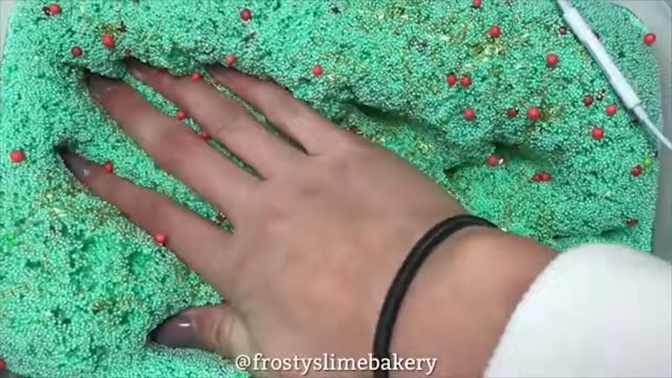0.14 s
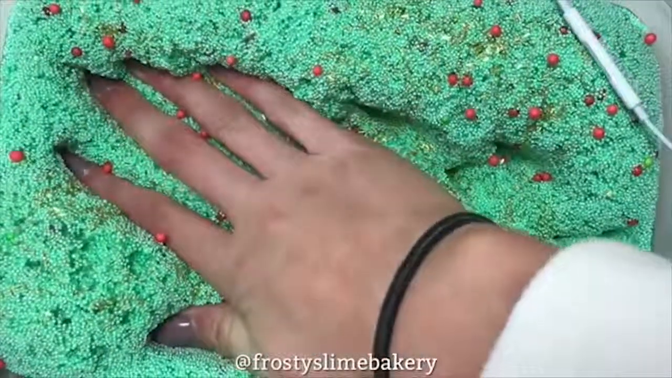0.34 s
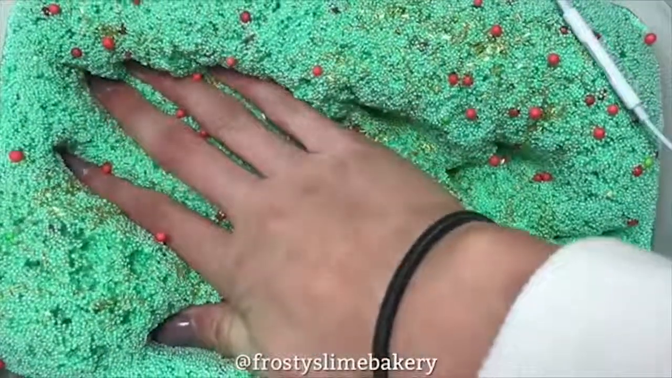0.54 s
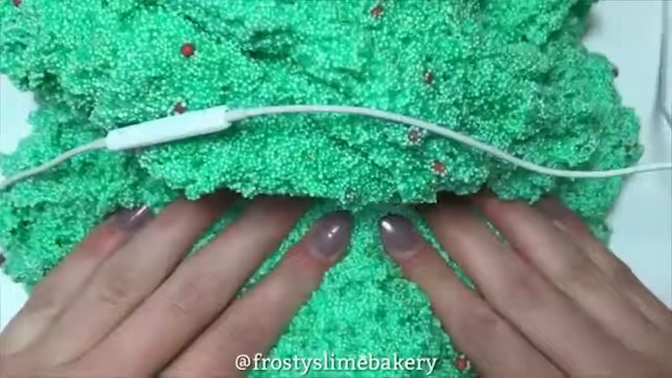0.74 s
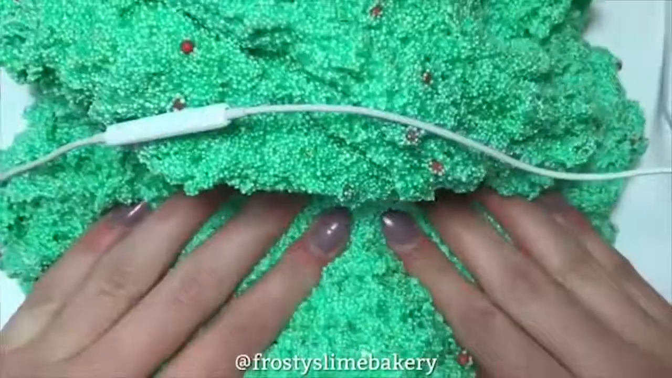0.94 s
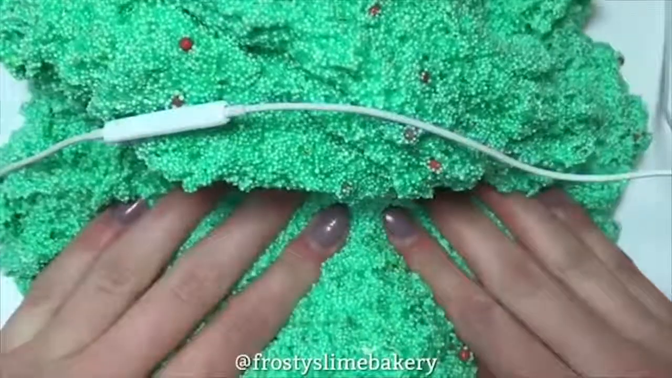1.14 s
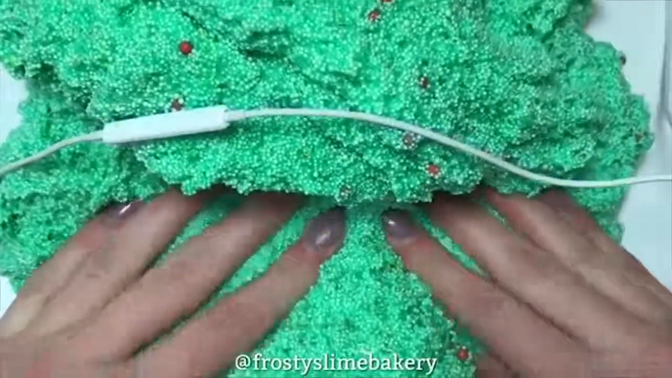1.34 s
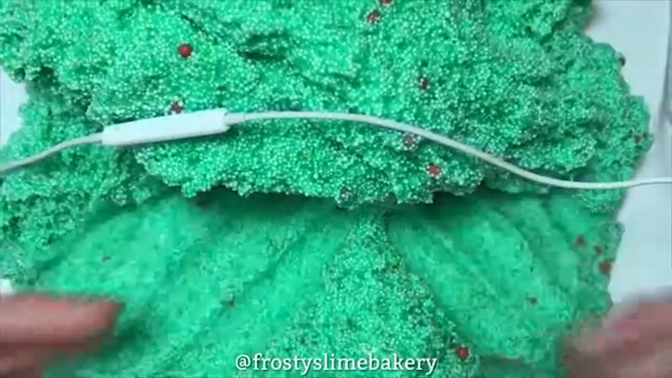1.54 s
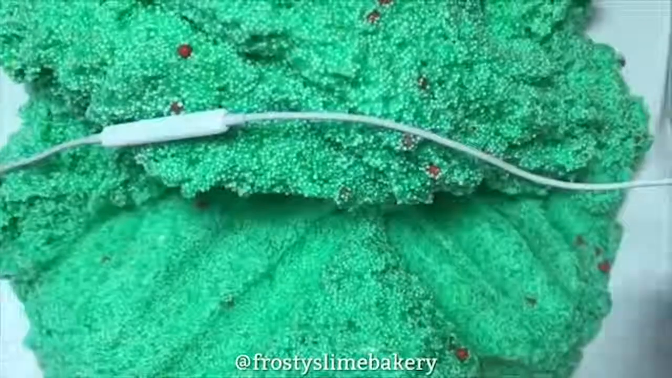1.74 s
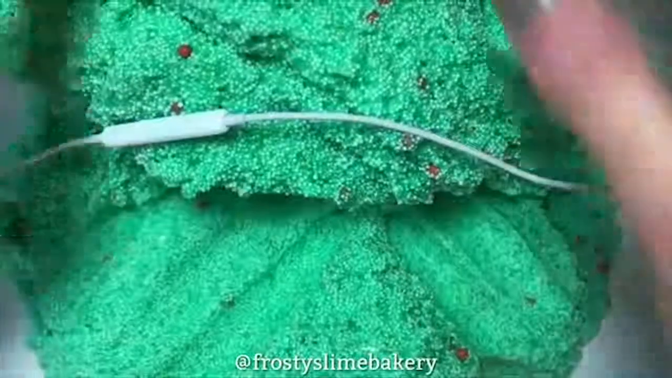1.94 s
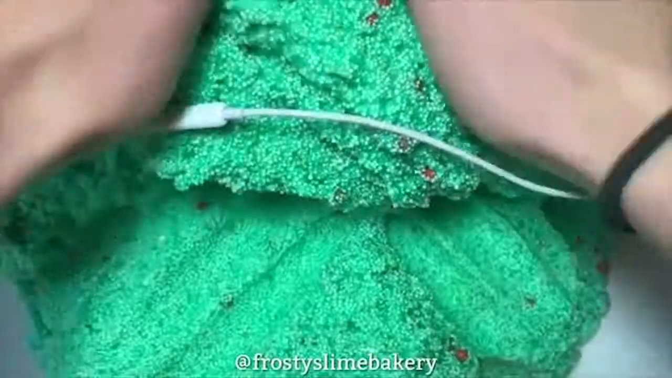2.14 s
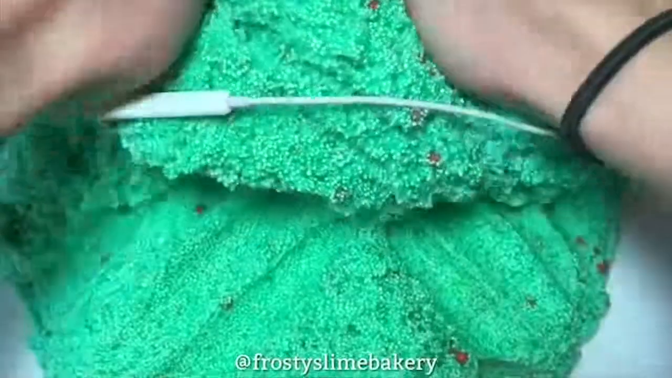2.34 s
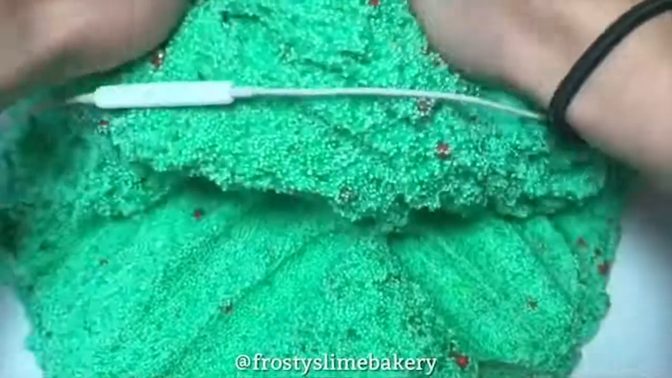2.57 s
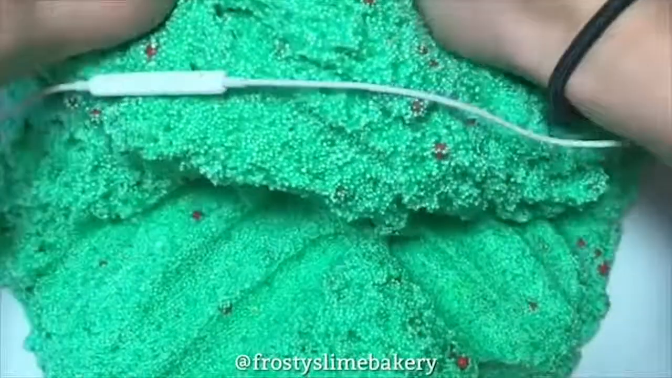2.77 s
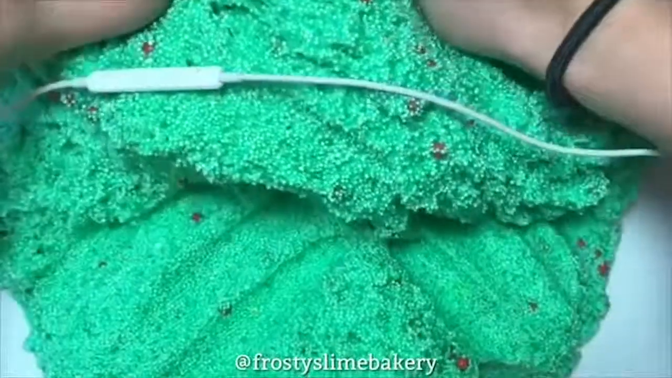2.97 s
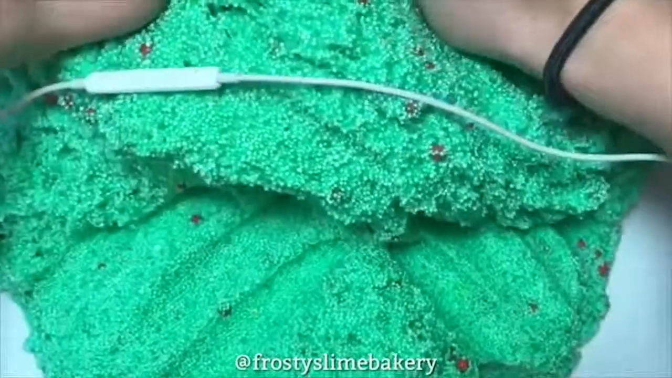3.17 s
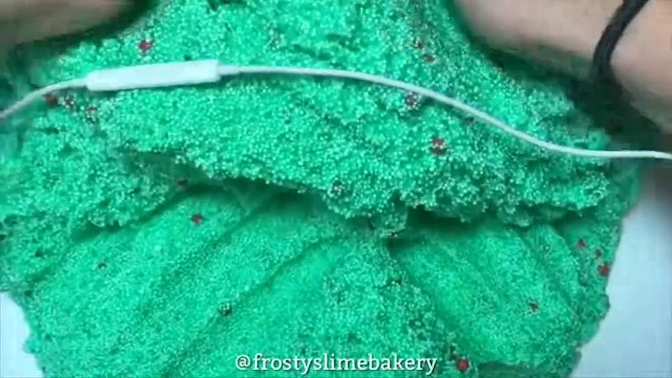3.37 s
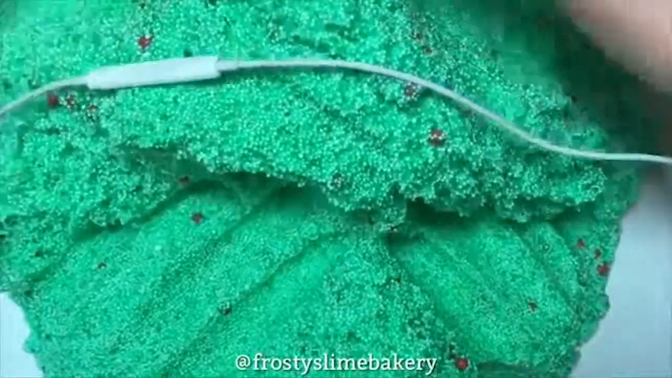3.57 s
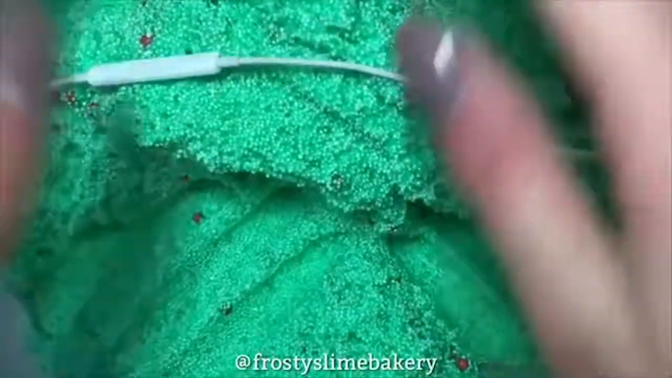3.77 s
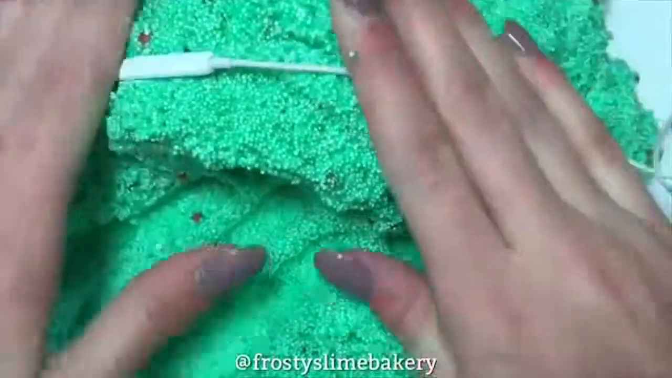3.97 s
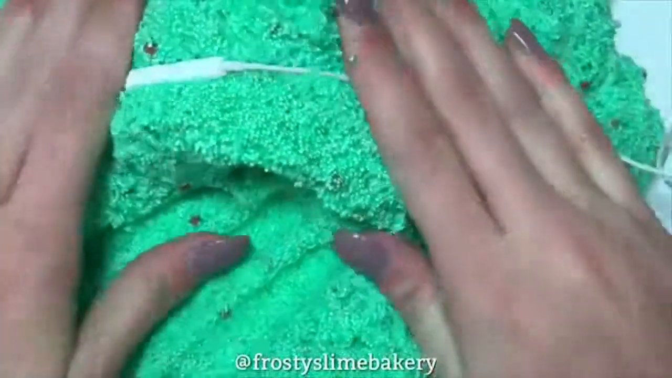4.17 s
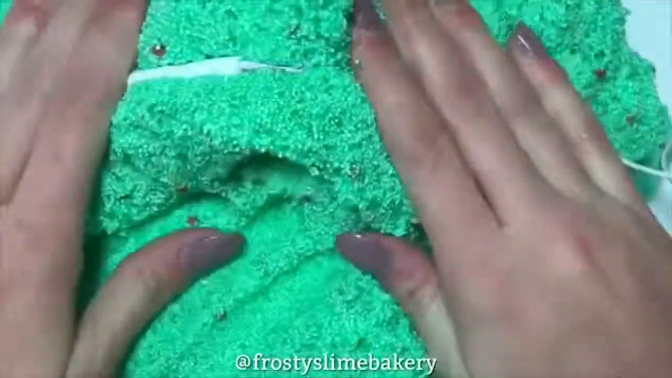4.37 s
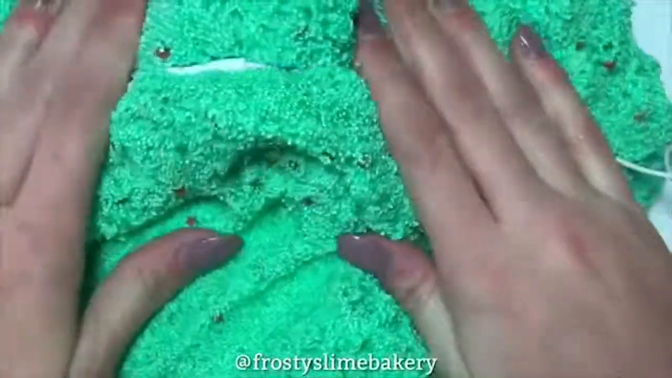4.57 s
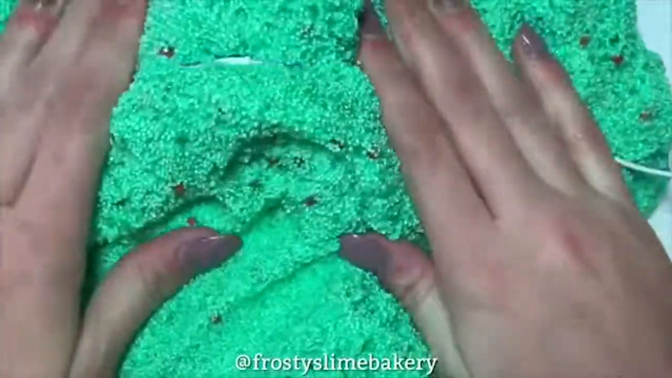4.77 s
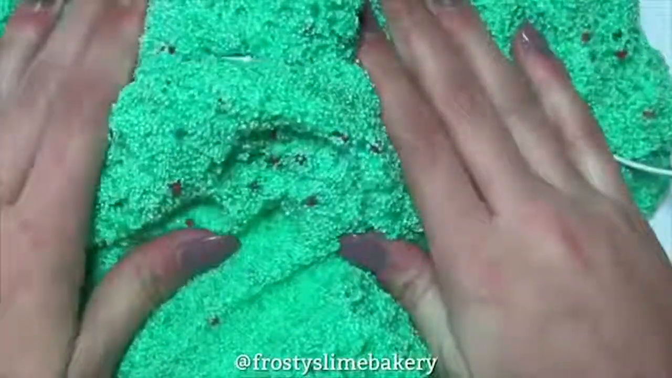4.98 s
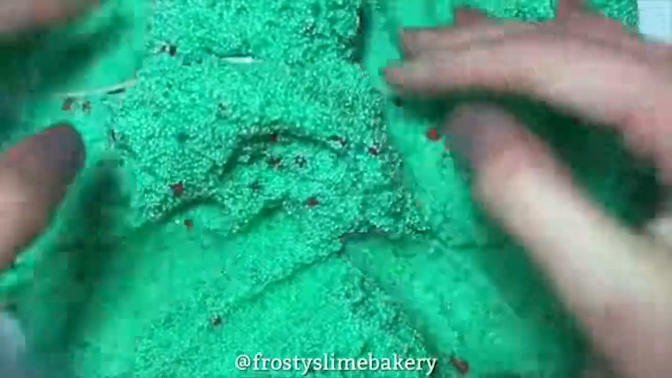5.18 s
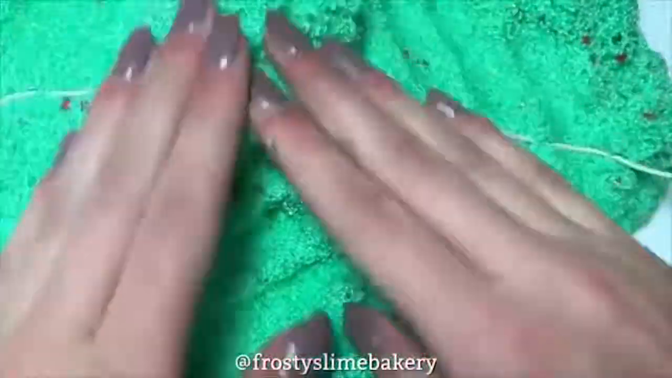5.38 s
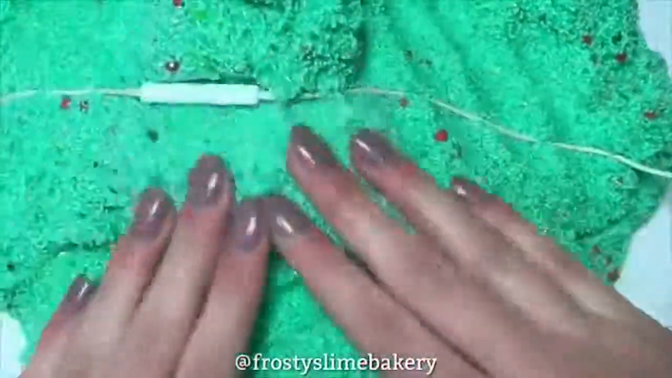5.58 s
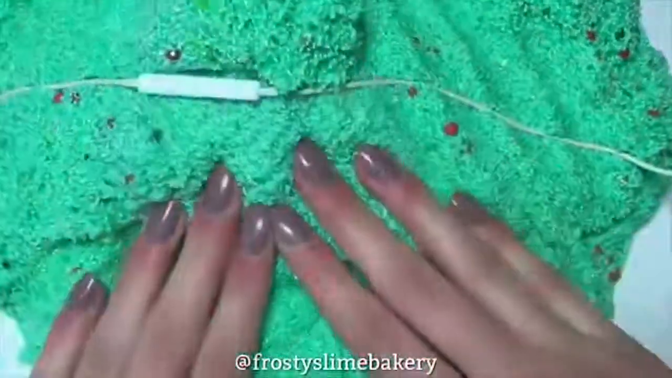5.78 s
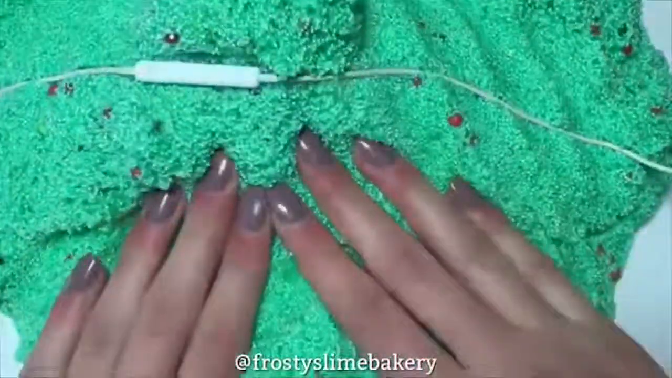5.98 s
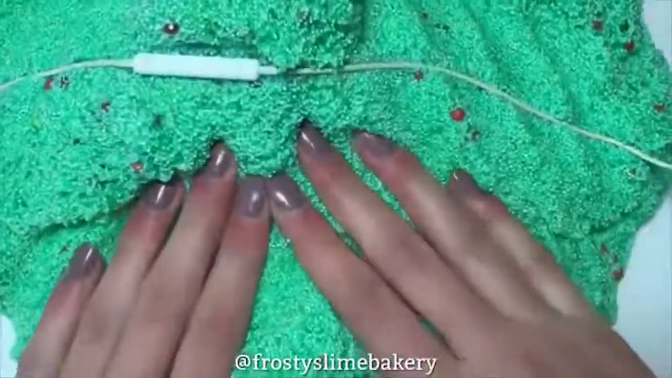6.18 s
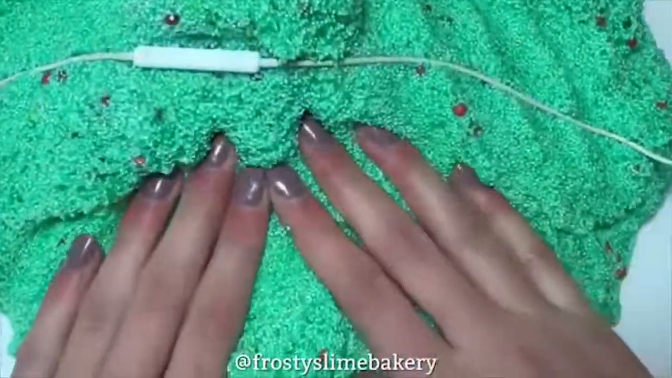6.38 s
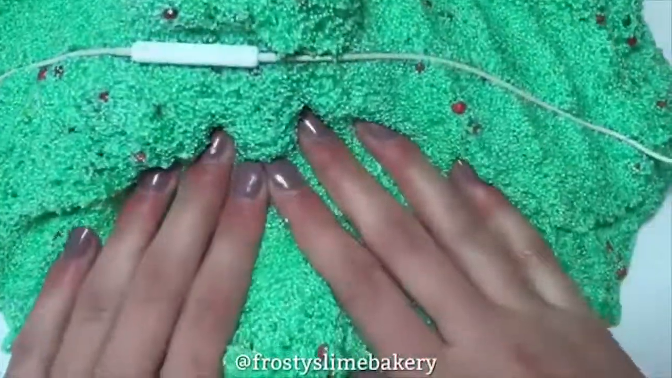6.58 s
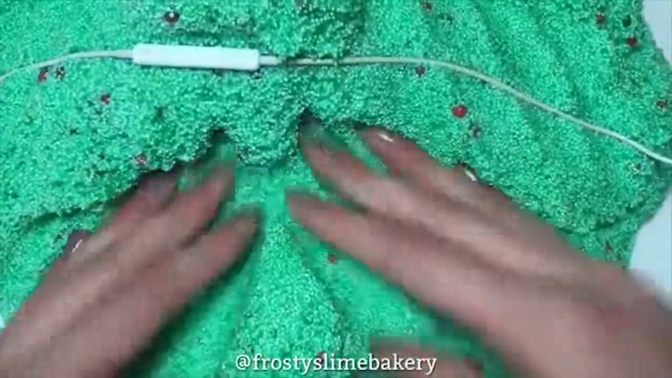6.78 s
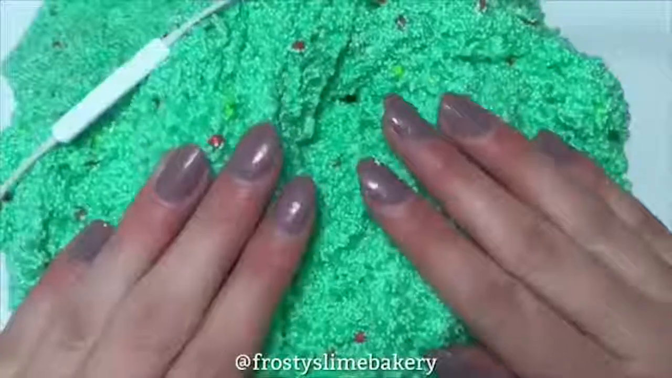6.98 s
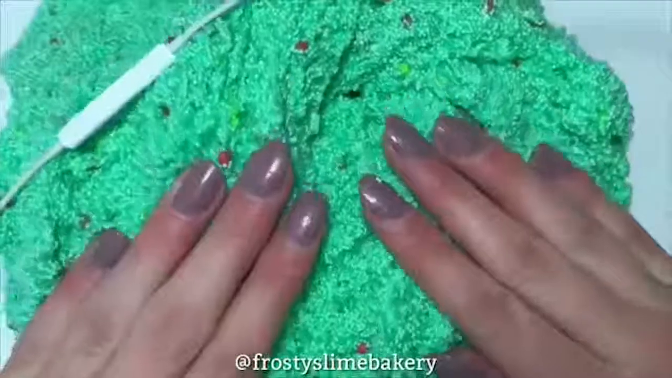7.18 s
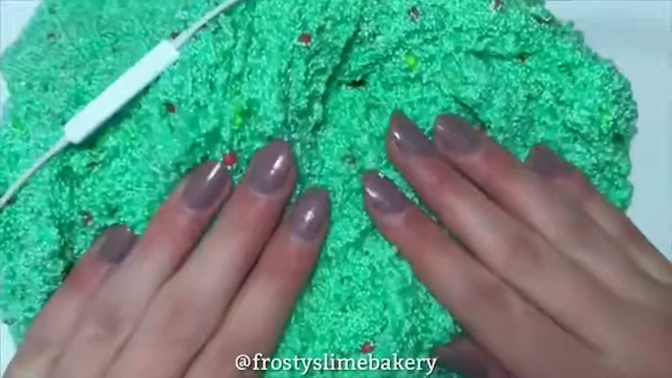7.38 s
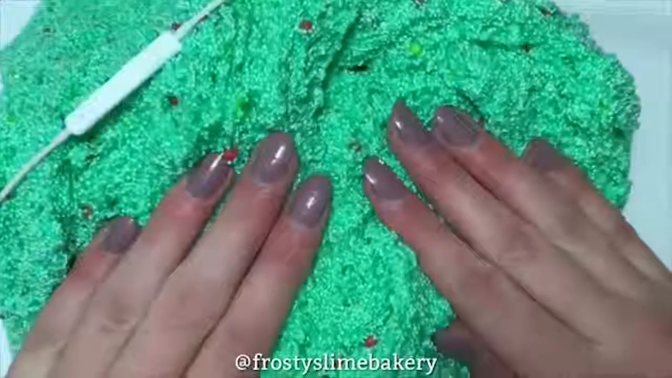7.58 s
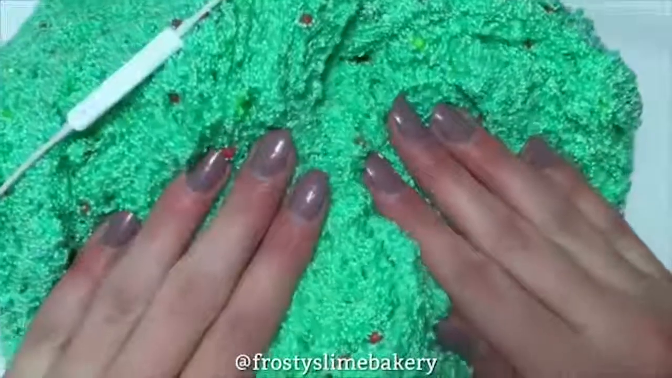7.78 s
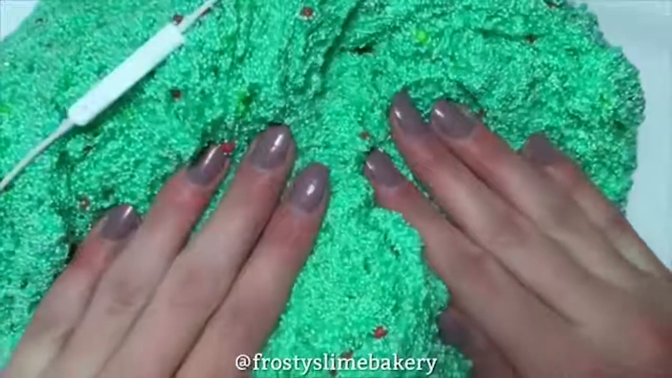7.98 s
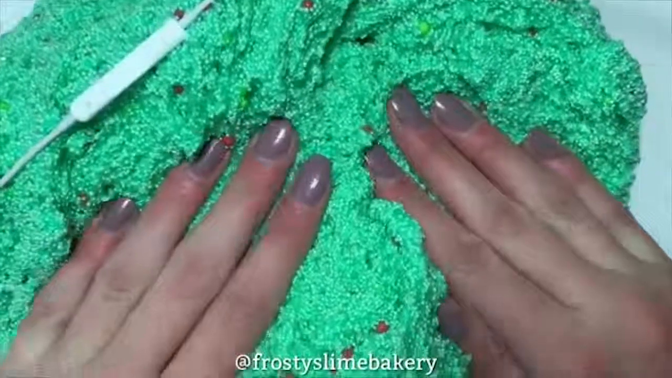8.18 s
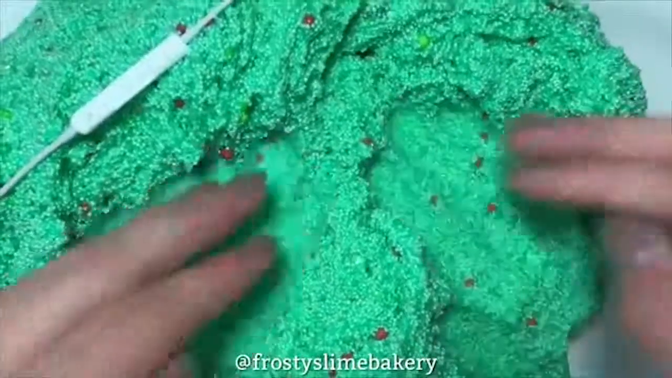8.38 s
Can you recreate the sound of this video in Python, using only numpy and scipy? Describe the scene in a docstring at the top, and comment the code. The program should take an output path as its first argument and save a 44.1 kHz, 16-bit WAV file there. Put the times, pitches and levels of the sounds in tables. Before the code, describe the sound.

Fingers squeeze foam-bead slime against a small microphone. Soft crackle over a low hum begins, the hum soon stops; sparse snaps follow, then a quick fizzy peel with a falling rumble. After a quiet gap, crackle grows, another peel, then a very loud burst of popping that briefly overloads. A strong ripping peel leads into more dense crunching, thinning out, then a fresh press and a last small peel. Very close, dry, faint hiss.

```python
"""First comes dense crackle over a low hum that soon stops: hands press foam-bead slime on a small cord microphone.
Air pockets between the beads burst, each a bright snap with a dull tick; single larger ones are louder pops.
A peel is a dense fizz of many bursts with a gliding rumble of low noise; twice air whistles in a narrow noise band.
Once the slime closes over the microphone, and pressure jumps, which leak away exponentially, overload it."""
import sys
import numpy as np
from scipy import signal
from scipy.fft import rfft, irfft, next_fast_len
from scipy.io import wavfile
from scipy.ndimage import uniform_filter1d

SR = 44100
rng = np.random.default_rng(int(sys.argv[2]) if len(sys.argv) > 2 else 0)


def put_to_file(sound):
    """Save the sound as 16-bit audio at rate SR, in the file named by the first command-line argument."""
    columns = np.atleast_2d(sound).T  # one column per channel
    safe = np.clip(columns, -1, 1)
    whole_steps = np.round(safe * 32767)
    wavfile.write(sys.argv[1], SR, whole_steps.astype(np.int16))


N = 371322

# Levels of sources are those before the microphone; levels of foam are also before the gains of its layers.
# Spells of crackle, under a press or as the slime settles: start t/s, time of the first change t/s,
# force eases at t/s, end t/s, first level/dB, level after the change/dB, dull part relative to the level/dB
CRACKLE_SPELLS = [(0, 0.22, .75, 0.76, -41, -44.5, 1), (.76, 0.13, 1.4, 1.72, -49.5, -47, -5),
                  (2.221, 0.18, 3.08, 3.45, -58.5, -38.5, -5.5), (3.73, .01, 3.67, 3.865, -47, -46.5, -11),
                  (4.095, 0.14, 4.45, 5.24, -32.5, -25.5, -7), (5.33, 0.24, 5.84, 5.46, -51, -54, -4),
                  (5.535, 0.027, 5.57, 7, -46, -26, -8.5), (6.99, 0.11, 6.8, 7.3, -45.5, -63, 2.5),
                  (7.159, 0.046, 12, 8.81, -41, -37, -5.5)]
# Fingers peel off: start t/s, skin tears free at t/s, level after the rise/dB, level at the tear/dB,
# dull part at the tear relative to the level/dB
FINGER_PEELS = [(1.506, 1.639, -21, -26.5, -4.5), (3.515, 3.63, -24.5, -18.5, -10),
                (3.602, 3.722, -34, -25, -4.5), (5.235, 5.318, -14.5, -10, -8.5),
                (6.887, 6.972, -21, -21, -4), (8.317, 8.438, -43.5, -25.5, -9)]
# Single pops: t/s, level/dB, pitch f/Hz, dull part relative to the level/dB
SINGLE_POPS = [(0.067, -14, 10700, -24), (0.0842, -16.5, 7000, -1), (0.119, -17, 2000, -12),
               (0.2372, -15, 9500, -7.5), (0.283, -20, 1310, -12), (0.3014, -7, 6500, -31),
               (0.3192, -14, 3140, -26), (0.4231, -14, 5630, -0.5), (0.4702, 2, 7640, -14.5),
               (0.4812, -12.5, 3040, -15), (0.7631, -10.5, 3550, -17), (0.798, -18, 7800, -20),
               (0.932, -15.5, 10700, -32), (0.9899, -11.5, 7440, -19), (1.0013, -16.5, 7400, -18),
               (1.106, -13, 9400, -36), (1.18, -19, 8900, -30), (1.1996, -12, 11100, -47),
               (1.21, -18, 10700, -43), (1.2305, -6, 10600, -47), (1.2936, -11, 9800, -53),
               (1.3002, -16, 8000, -38), (1.3707, -18.5, 5850, -5), (1.4431, -14.5, 7850, -8),
               (1.5484, -2.5, 10000, -23), (1.6799, -11.5, 10400, -29), (2.168, -24, 6200, -16),
               (2.3706, -8.5, 11740, -39), (2.381, -6, 9700, -32), (2.415, -8, 8600, -35),
               (2.453, -11.5, 4500, -19), (2.5348, -1, 8600, -34), (2.5956, -11, 4800, -9),
               (2.6019, -11, 2970, -11), (2.8501, -4.5, 6474, -47), (2.887, -16, 8300, -29),
               (3.005, -9, 6650, -47), (3.0915, -5.5, 8700, -56), (3.552, -7, 11800, -40),
               (3.563, -7, 10400, -33), (3.7309, -8.5, 10900, -14), (3.8206, -17.5, 10400, -28),
               (4.0983, -4.5, 5300, -48), (4.109, -22, 2600, -15), (4.115, 10.5, 13300, -45),
               (4.1316, -4, 9300, -38), (4.1502, 0, 10100, -18), (4.1613, 0, 12200, -31),
               (4.182, 7.5, 11100, -21.5), (4.209, 1.5, 10050, -21), (4.223, 14, 8300, -14),
               (4.2607, 6, 6160, -10.5), (4.2726, 13, 6700, -13), (4.284, 8.5, 5870, -10),
               (4.301, -2.5, 5840, -10), (4.322, -2, 8340, -5), (4.3986, 4, 4400, -38),
               (4.4053, -0.5, 4900, -32), (4.4593, 1.5, 8240, -35), (4.531, 2, 9000, -36),
               (4.553, -17, 1150, -15), (4.5644, -3, 7600, -27), (4.6101, -4.5, 10300, -16),
               (4.672, -7, 8400, -34), (4.689, -11, 9500, -19), (4.766, -6.5, 7800, -45),
               (4.811, -13, 6036, -29), (4.842, -19, 2070, -18), (5.059, -18, 7925, -28),
               (5.095, -12, 8100, -27), (5.114, -27, 983, -3), (5.1196, -6.5, 5470, -36),
               (5.5873, -3, 11030, -15), (5.6069, 9.5, 9500, -25), (5.651, -1.5, 9150, -9),
               (5.758, -21, 8640, -31.5), (5.7965, -1.5, 10150, -39), (5.9058, -10.5, 2700, -36),
               (5.977, -16, 2940, -4), (6.034, -9.5, 8300, -41), (6.049, -11, 8800, -22),
               (6.127, -16.5, 4600, -46), (6.278, -16, 10870, -22), (6.3395, 8, 8140, -60),
               (6.3523, 1.5, 10900, -25), (6.58, -12.5, 7040, -47), (6.6752, -11.5, 7900, -48),
               (6.7037, -6.5, 5800, -40), (6.736, -14.5, 8700, -15), (7.183, -18, 5900, -6),
               (7.201, -0.5, 8200, -23), (7.2173, 3.5, 8800, -35), (7.2426, -2.5, 8300, -45),
               (7.317, -16, 3970, -7), (7.3414, -9.5, 8700, -46), (7.3931, 7.5, 7800, -46),
               (7.396, 6.5, 7950, -26), (7.471, -18, 7000, -4.5), (7.4892, 2, 11100, -45),
               (7.536, -8.5, 9600, -38), (7.737, 9.5, 8630, -34), (7.7517, -8, 8950, -45),
               (7.7789, -6, 7960, -32), (7.9791, -7, 9000, -45), (8.0691, -5, 9300, -49),
               (8.1351, -10.5, 10400, -13.5), (8.309, -25, 3250, -26)]
# Air whistles through the gap under a moving finger: start t/s, end t/s, first f/Hz, last f/Hz, level/dB
AIR_WHISTLES = [(3.558, 3.661, 2926, 1894, -31), (7.283, 7.31, 6500, 10500, -36)]
# The slime heaves under the microphone: start t/s, strongest at t/s, dies within t/s, strongest level/dB,
# rumble starts at f/Hz, glides towards f/Hz
SLIME_HEAVES = [(1.501, 1.632, 0.15, -27.5, 404.3, 61.6), (2.171, 2.382, .14, -47, 65.9, 58.8),
                (3.489, 3.701, 0.086, -34, 198.5, 105.1), (3.693, 3.825, 0.057, -28.5, 96.1, 53.9),
                (5.235, 5.337, 0.14, -16, 402.8, 75.3), (5.529, 5.553, 0.25, -26.5, 117.5, 170.5),
                (6.878, 6.998, 0.095, -22, 298.7, 68.05), (8.329, 8.451, 0.066, -39, 195, 176)]
# Pressure jumps at the covered microphone: t/s, size [full scale, before overload], leak time t/s
PRESSURE_JUMPS = [(4.098, 0.2, 0.0032), (4.2239, 1, 0.0088), (4.273, 1.56, 0.0044), (4.2835, -3.5, 0.0011),
                  (4.289, 0.03, 0.046), (4.301, -0.7, 0.0082), (4.322, -1.43, 0.012)]
# Colour of the bright part of a burst: f/Hz, level/dB
SNAP_COLOUR = [(1060, -35), (1800, 1.5), (7050, -4.5), (9040, 1.5), (14000, -1.5)]
# Colour of the steady hiss and room noise: f/Hz, relative level/dB
ROOM_COLOUR = [(25, 1), (107, -5), (144, -10), (219, -9), (293, -15.5), (436, -16.5), (554, -19),
               (5840, -27), (10700, -22.5), (14000, -30)]
# Colour of the low hum heard at first: f/Hz, relative level/dB
HUM_COLOUR = [(25, 2), (139, -9.5), (211, -0.5), (310, -25), (400, -9), (520, -28), (880, -120)]
# Colour of the rumble noise around a pitch of 1000 Hz: f/Hz, level/dB
RUMBLE_COLOUR = [(100, -15), (600, -1), (1000, 0), (1700, -7), (3000, -15), (6000, -29), (20000, -80)]

# Layers of bursts: level of the bright part/dB, level of the dull part/dB
PRESS_CRACKLE_DB, PRESS_FIZZ_DB = (3.5, 1.0), (-8.5, -8.5)
PEEL_CRACKLE_DB, PEEL_FIZZ_DB = (-13, -14), (-0.5, -0.5)

SAG_DB_PER_S, EASE_DB, EASE_S = 7, -13, 0.34  # crackle sags, and settles once the force eases
PEEL_RISE_S, PEEL_FROM_DB, PEEL_STOP_S, PEEL_STOP_DB = 0.046, -20.5, 0.035, -20
DARKEN_DB = 3.5  # the relative level of the dull part grows by this much during a peel
LEAN_DB = 5  # some pockets are mostly snap, others mostly tick
PATCH_DB = 2.5  # spread of the patches in the colour of a peel
HEAVE_RISE_S, HEAVE_FROM_DB, HEAVE_NEAR_DB, HEAVE_FALL_DB = 0.068, -31, -7, -35
GLIDE_SHARE = .72  # time of the pitch glide, as a share of the time to the strongest moment
ROOM_DB, HUM_DB, HUM_END_S = -55, -49, .78
SHELF_HZ, SHELF_DB, EDGE_HZ = 14000, -35.5, 16490  # treble loss and band limit
CLIP_LEVEL, DRAIN_HZ = .91, 1.1  # overload [full scale], corner of the coupling


def bursts(per_s, spread_db, clump_db, halo_db):
    """Shot noise: random impulses in clumps, sizes long-tailed; each excites a bright snap and a dull tick."""
    # The clumps scale the sizes, not the number of bursts.
    clump = evened(uniform_filter1d(uniform_filter1d(rng.standard_normal(N), 250), 250))
    fire, chance, sign = rng.random((3, N))
    size_db = spread_db * np.minimum(-np.log(1 - chance), 3) + clump_db * clump
    size = gain_of(size_db) * np.sign(sign - .5) * (fire < per_s / SR)

    # Twelve kinds of pocket, each with its colour
    kind, t = rng.integers(0, 12, N), np.arange(600) / SR
    snaps_hz = np.geomspace(3800, 13000, num=12)
    ticks_hz = rng.permutation(np.geomspace(370, 2600, num=12))
    leans = rng.permutation(np.linspace(-1, 1, num=12))
    rings = rng.permutation(np.geomspace(1, 2.3, num=12))
    bright, dull = np.zeros((2, N))
    for k, (hz, low_hz, lean, ring) in enumerate(zip(snaps_hz, ticks_hz, leans, rings)):
        # The film around the pocket keeps tearing.
        halo = rng.standard_normal(600) * gain_of(halo_db - 60 * t / 0.011)
        halo[0] = 1
        train = signal.oaconvolve(size * (kind == k), halo)[:N]
        snap = wavelet(hz, 1.12 * ring) * np.sqrt(hz / ring)
        tick = wavelet(low_hz, 1.26) * low_hz ** 1.58
        bright += signal.oaconvolve(train, snap)[:N] * gain_of(LEAN_DB * lean)
        dull += signal.oaconvolve(train, tick)[:N] / gain_of(LEAN_DB * lean)
    return evened(coloured(bright, SNAP_COLOUR)), evened(dull)


def foam(tables, layers):
    """Superposition and modulation: layers of (bursts, their levels) follow the force of the hands."""
    gain, dull_share_db = play(tables, .006)
    total = 0
    for (bright, dull), (bright_db, dull_db) in layers:
        total = total + gain_of(bright_db) * bright + gain_of(dull_db + dull_share_db) * dull
    return gain * total


def press(start, change_s, ease, end, first_db, db, dull_db):
    """Envelope in t/s, level/dB, dull/dB: linear rise or fall, then sag, in dB; settling as the force eases."""
    s = np.linspace(start, end, num=200)
    change_db = (first_db - db) * np.clip(1 - (s - start) / change_s, 0, 1)
    sag_db = SAG_DB_PER_S * np.maximum(s - start - change_s, 0)
    ease_db = EASE_DB * (1 - np.exp(-np.maximum(s - ease, 0) / EASE_S))
    return np.transpose([s, db + change_db - sag_db + ease_db, dull_db + 0 * s])


def peel(start, tear, first_db, last_db, dull_db):
    """Envelope in t/s, level/dB, dull/dB: quick rise, the pull, quick stop as the skin comes free."""
    return [(start, first_db + PEEL_FROM_DB, dull_db - DARKEN_DB),
            (start + PEEL_RISE_S, first_db, dull_db - DARKEN_DB),
            (tear, last_db, dull_db),
            (tear + PEEL_STOP_S, last_db + PEEL_STOP_DB, dull_db)]


def patchy(x):
    """Random spectral weighting: patches of time and pitch rise and fall as parts of the skin let go."""
    spectrum = signal.stft(x, nperseg=256)[2]
    noise = rng.standard_normal(spectrum.shape[::-1])
    patches = evened(uniform_filter1d(uniform_filter1d(noise, size=5, axis=0), size=10, axis=1))
    weight = gain_of(PATCH_DB * patches.T - 0.5)
    return signal.istft(spectrum * weight, nperseg=256)[1][:N]


def pops():
    """Impulse response: a pop is a ringing snap and a dull tick; neighbours tear just before and after it."""
    out, t = np.zeros(N + 800), (np.arange(800) - 200) / SR
    for s, db, hz, dull_db in SINGLE_POPS:
        chance, gate = rng.standard_normal((2, 800))
        tick_chance, sign = rng.standard_normal(2)
        head = wavelet(hz, 1.24) + hz / 17000 * wavelet(10640, 1.74)
        # Middle-sized pockets ring on.
        ring_db = -21 - 13.3 * abs(np.log2(hz / 3600))
        head += gain_of(ring_db) * wavelet(hz, hz * 0.005)
        head += gain_of(dull_db) * wavelet(1500 * gain_of(tick_chance), .8)
        tear_db = -18.0 - 60 * np.maximum(t / 0.02, -t / 0.0039)
        tears = chance * (abs(gate) > 1.4) * gain_of(tear_db)
        tears[200] = 1  # the pop itself
        pop = signal.oaconvolve(tears, head)[:800]
        out[round(s * SR) - 206:][:800] += np.sign(sign) * gain_of(db) * pop
    return signal.lfilter(*signal.butter(2, 300, "high", fs=SR), out[:N])


def heave(start, top, fall_s, db, from_hz, to_hz):
    """Envelope in t/s, level/dB, f/Hz: the rumble swells and dies while its pitch relaxes."""
    s = np.linspace(start, top + fall_s, num=100)
    times = [start, start + min(HEAVE_RISE_S, (top - start) / 2), top, s[-1]]
    level_db = db + np.interp(s, times, [HEAVE_FROM_DB, HEAVE_NEAR_DB, 0, HEAVE_FALL_DB])
    glide = np.exp(-((s - start) / (GLIDE_SHARE * (top - start))) ** 2)
    return np.transpose([s, level_db, to_hz + (from_hz - to_hz) * glide])


def heaves():
    """Frequency scaling: low noise and a tone in it glide together, mostly down as the fingers' hollow grows."""
    gain, hz = play([heave(*row) for row in SLIME_HEAVES], 0.01)
    noise = evened(coloured(rng.standard_normal(N), RUMBLE_COLOUR))
    turns = np.cumsum(hz) / SR
    rumble = np.interp(turns * SR / 1000, np.arange(N), noise)  # read slower for a lower pitch
    wobble = np.sin(2 * np.pi * (turns + rng.random()))
    return gain * (rumble + gain_of(-14.5) * wobble)


def jumps():
    """Exponential relaxation: a sudden pressure step leaks away behind the membrane."""
    t, pressure = np.arange(N) / SR, np.zeros(N)
    for s, size, leak_s in PRESSURE_JUMPS:
        step = np.clip((t - s) / 0.00033, 0, 1)
        pressure += size * step * np.exp(-np.maximum(t - s, 0) / leak_s)
    return pressure


def whistles():
    """Frequency-shifted noise: a narrow band sinks as the gap widens and climbs as it narrows."""
    tables = [[(start, db, from_hz), (end, db, to_hz)] for start, end, from_hz, to_hz, db in AIR_WHISTLES]
    gain, hz = play(tables, 0.0075)
    a, b = signal.lfilter(*signal.butter(2, 250, fs=SR), rng.standard_normal((2, N)))
    carrier = np.exp(2j * np.pi * np.cumsum(hz) / SR)
    return gain * evened(((a + 1j * b) * carrier).real)


def room():
    """Stationary filtered noise: microphone hiss and low room noise, with a louder low hum at first."""
    hiss, hum = rng.standard_normal((2, N))
    early = np.clip((HUM_END_S - np.arange(N) / SR) / 0.012, 0, 1)
    steady = gain_of(ROOM_DB) * evened(coloured(hiss, ROOM_COLOUR))
    return steady + early * gain_of(HUM_DB) * evened(coloured(hum, HUM_COLOUR))


def gain_of(db):
    """Decibel law: amplitude ratio of a level/dB."""
    return 10 ** (np.asarray(db) / 20)


def evened(x):
    """Normalisation to an RMS value of 1."""
    return x / np.sqrt(np.mean(x ** 2) + 1e-20)


def coloured(x, points):
    """Linear filtering: weights the spectrum by points of f/Hz, level/dB on a logarithmic frequency axis."""
    size = next_fast_len(len(x))
    f, db = np.transpose(points)
    hz = np.fft.rfftfreq(size, 1 / SR)
    weight = gain_of(np.interp(np.log(hz + 1), np.log(f + 1), db))
    return irfft(rfft(x, size) * weight, size)[:len(x)]


def wavelet(hz, cycles):
    """Damped oscillation: a few cycles under a soft rise and a quick fall, peak 1."""
    u = np.arange(300) / SR * hz / cycles
    w = u * np.exp(-3.0 * u) * np.sin(2 * np.pi * u * cycles)
    return w / abs(w).max()


def play(tables, fade_s):
    """Envelope: joins tables into a gain and a second control; the loudest rules, gaps are silent."""
    t, gain, other = np.arange(N) / SR, np.zeros(N), np.zeros(N)
    for rows in tables:
        s, db, value = np.transpose(rows)
        since_start = t - s[0] + fade_s * (s[0] < fade_s)  # no fade-in at the very beginning
        edge = np.clip(np.minimum(since_start, s[-1] - t) / fade_s, 0, 1)
        level = edge * gain_of(np.interp(t, s, db))
        other = np.where(level > gain, np.interp(t, s, value), other)
        gain = np.maximum(gain, level)
    return gain, other


def scene():
    """Superposition of all sources; presses and peels share the same two streams of bursts."""
    crackle = bursts(per_s=650, spread_db=6.0, clump_db=2.5, halo_db=-25)
    fizz = bursts(per_s=9000, spread_db=3.5, clump_db=2.0, halo_db=-30)
    presses = foam([press(*row) for row in CRACKLE_SPELLS],
                   [(crackle, PRESS_CRACKLE_DB), (fizz, PRESS_FIZZ_DB)])
    peels = foam([peel(*row) for row in FINGER_PEELS],
                 [(crackle, PEEL_CRACKLE_DB), (fizz, PEEL_FIZZ_DB)])
    return (presses + patchy(peels) + pops() + heaves() + jumps() + whistles() + room())[None]


def record(dry):
    """Transducer chain: lost top treble, clipping at overload, slow drain of the offset, then the band limit."""
    shelf = gain_of(SHELF_DB)
    corners_hz = [0, SHELF_HZ - 300, SHELF_HZ + 300, SR / 2]
    treble_loss = signal.firwin2(511, corners_hz, [1, 1, shelf, shelf], fs=SR)
    heard = signal.oaconvolve(dry, treble_loss[None], "same")
    clipped = np.clip(heard, -CLIP_LEVEL, CLIP_LEVEL)
    drained = signal.lfilter(*signal.butter(1, DRAIN_HZ, "high", fs=SR), clipped)
    band_limit = signal.firwin(511, EDGE_HZ, window=("kaiser", 9), fs=SR)
    return signal.oaconvolve(drained, band_limit[None], "same")


dry = scene()
out = record(dry)
put_to_file(out)
```